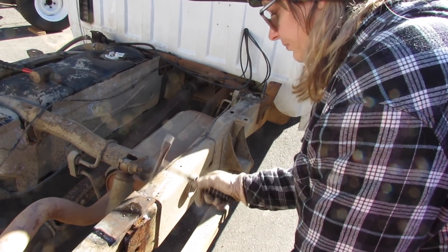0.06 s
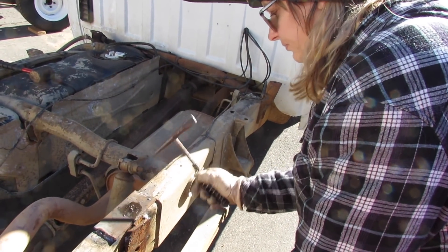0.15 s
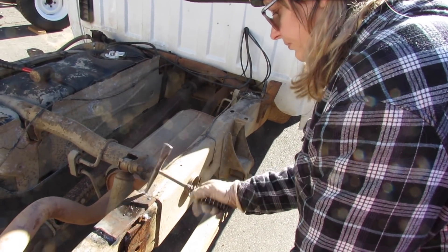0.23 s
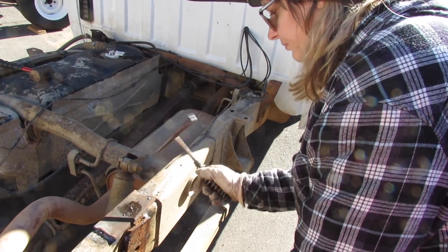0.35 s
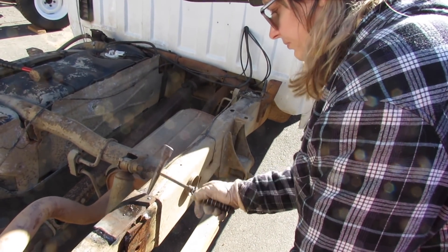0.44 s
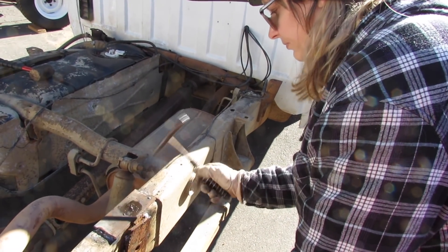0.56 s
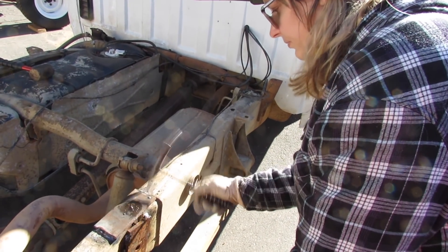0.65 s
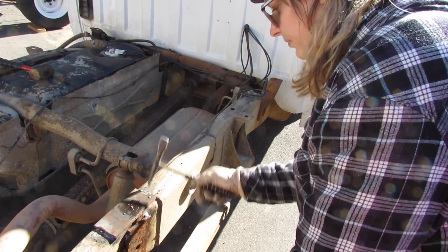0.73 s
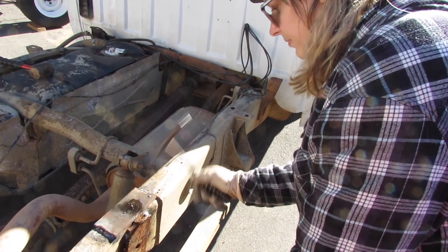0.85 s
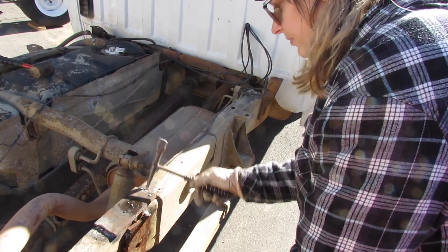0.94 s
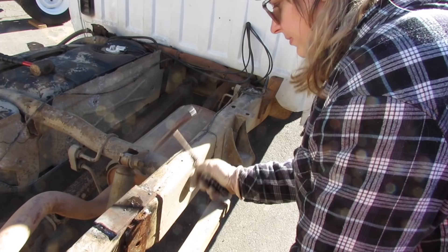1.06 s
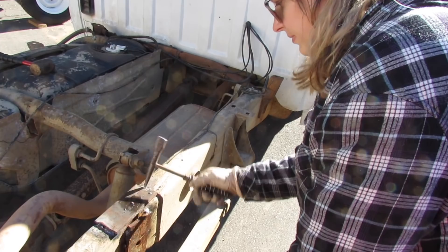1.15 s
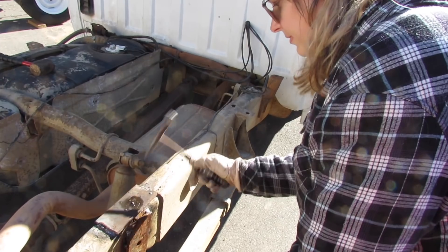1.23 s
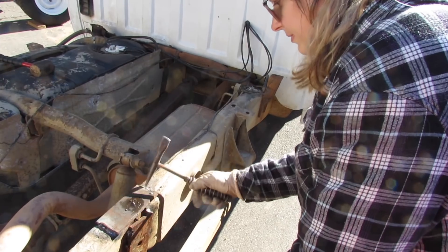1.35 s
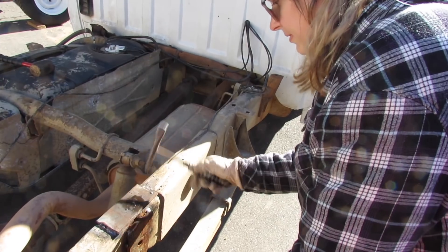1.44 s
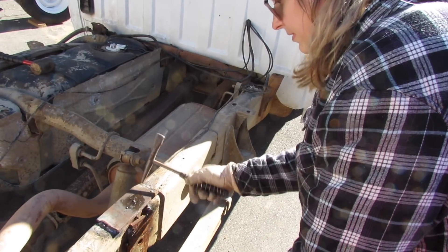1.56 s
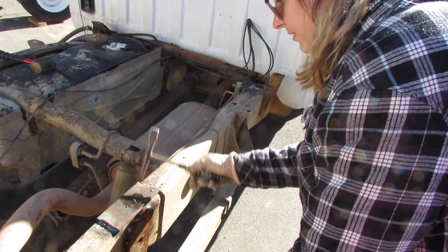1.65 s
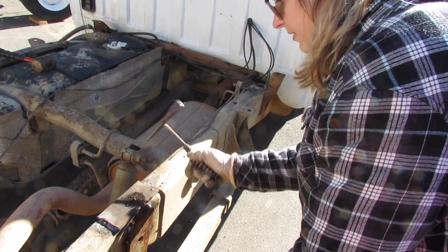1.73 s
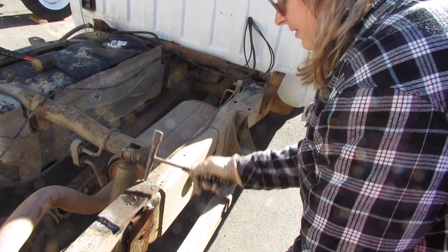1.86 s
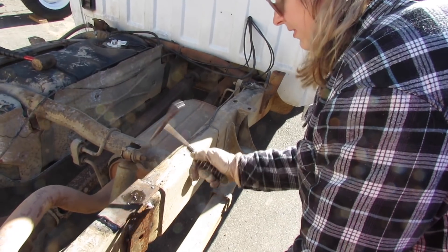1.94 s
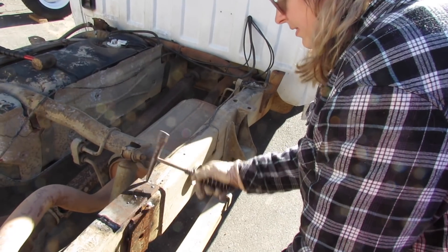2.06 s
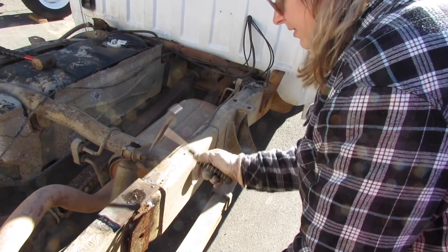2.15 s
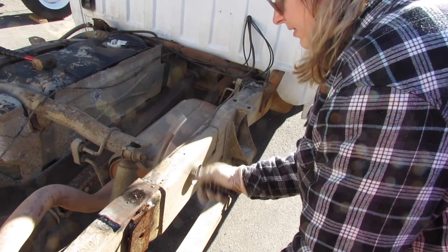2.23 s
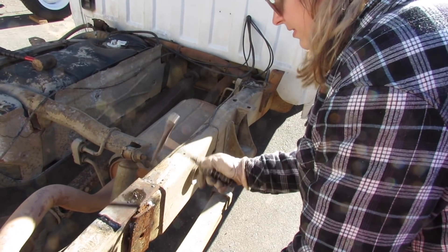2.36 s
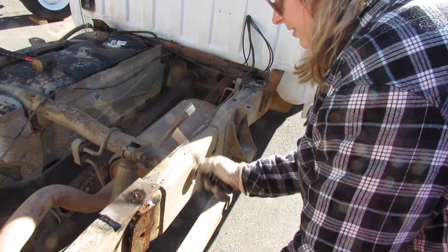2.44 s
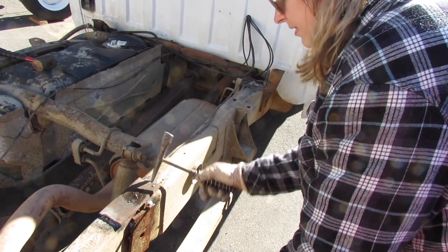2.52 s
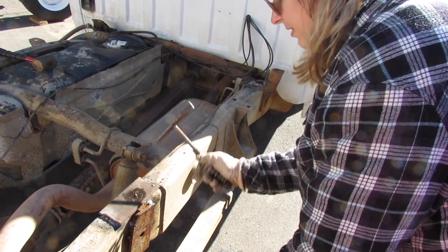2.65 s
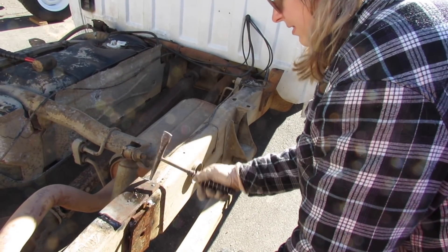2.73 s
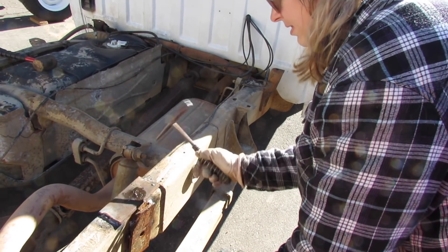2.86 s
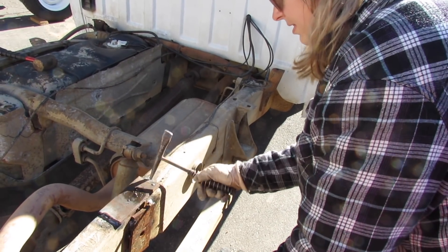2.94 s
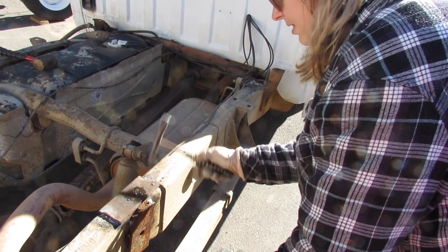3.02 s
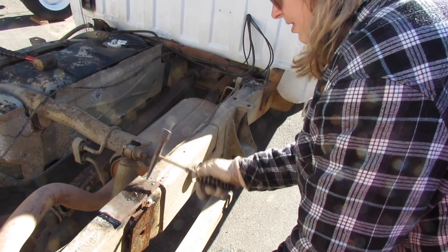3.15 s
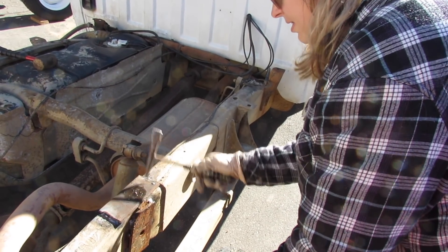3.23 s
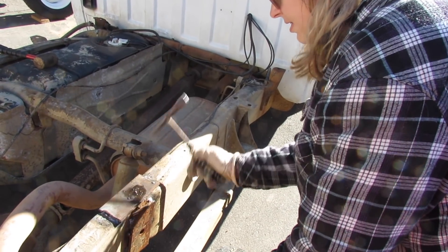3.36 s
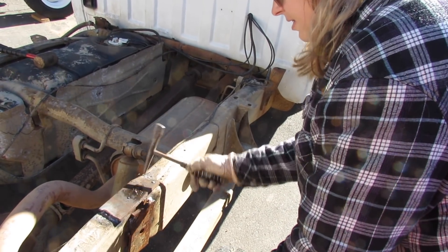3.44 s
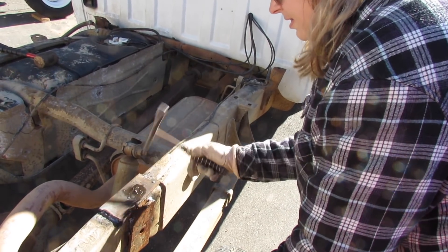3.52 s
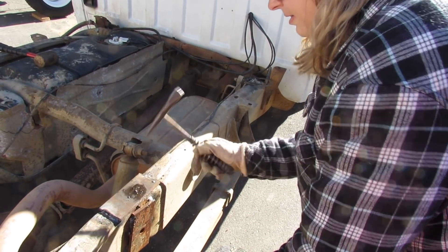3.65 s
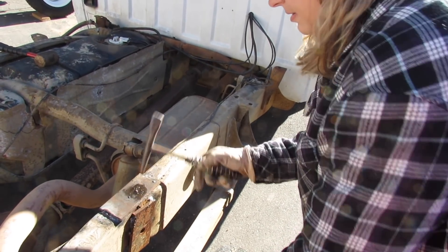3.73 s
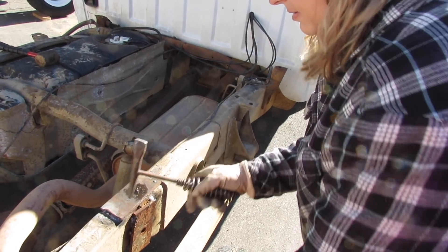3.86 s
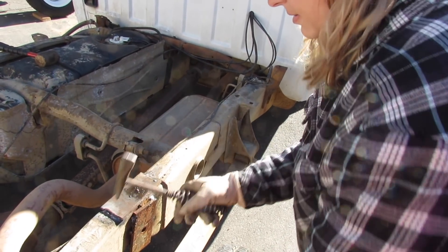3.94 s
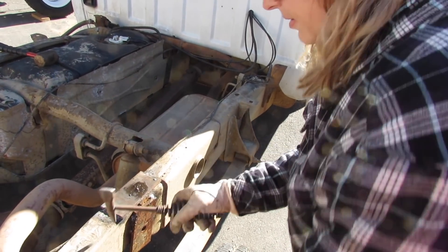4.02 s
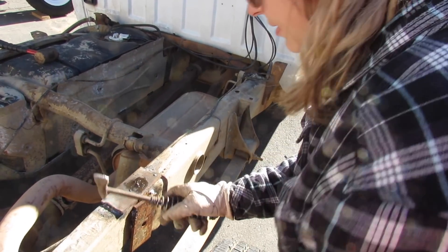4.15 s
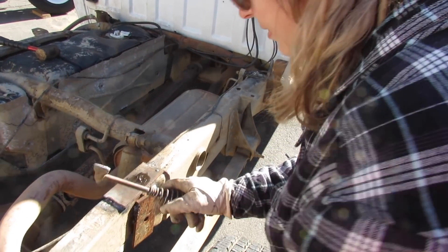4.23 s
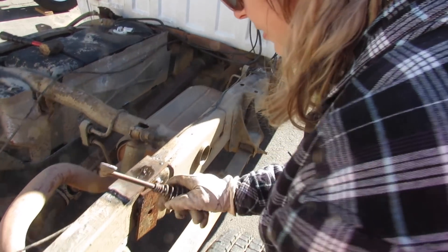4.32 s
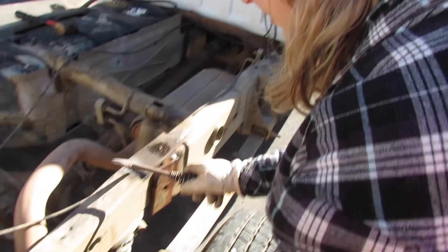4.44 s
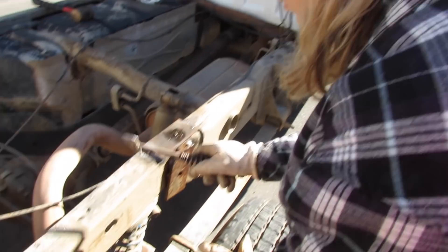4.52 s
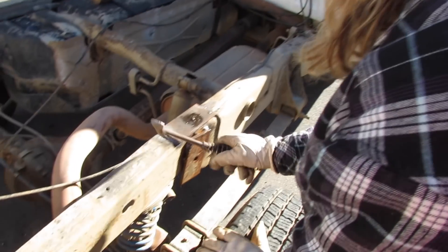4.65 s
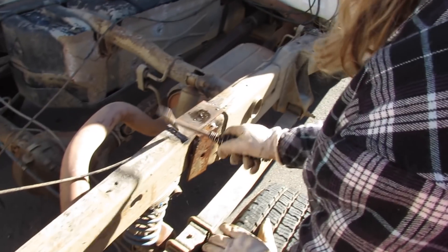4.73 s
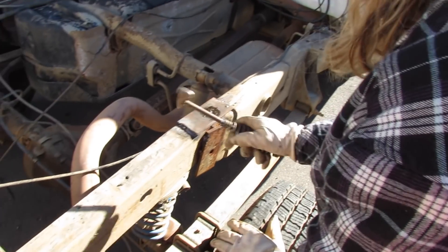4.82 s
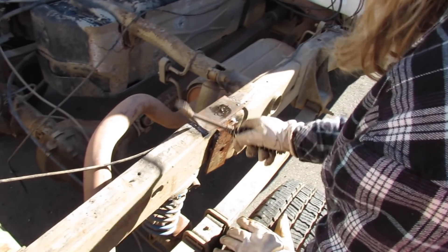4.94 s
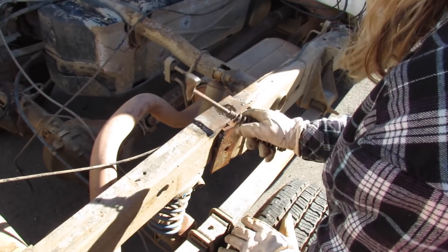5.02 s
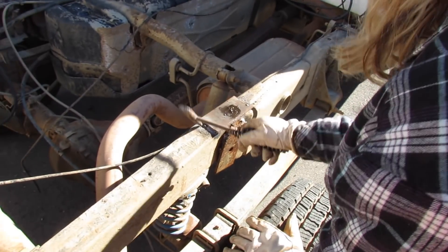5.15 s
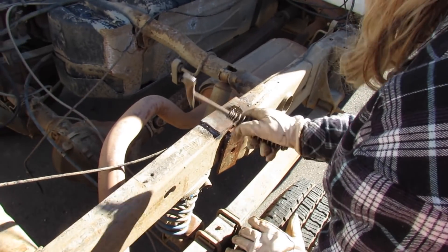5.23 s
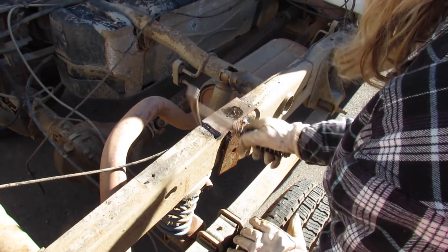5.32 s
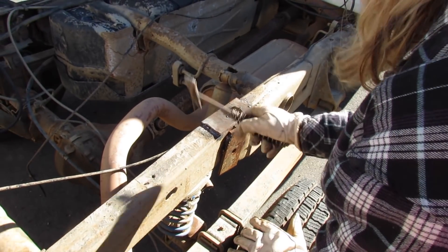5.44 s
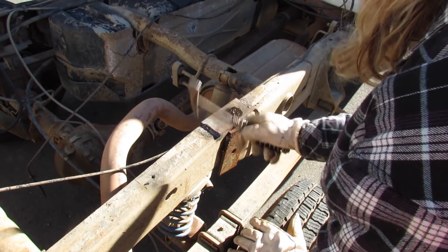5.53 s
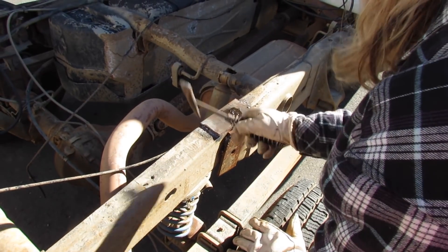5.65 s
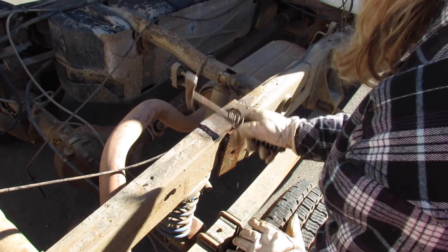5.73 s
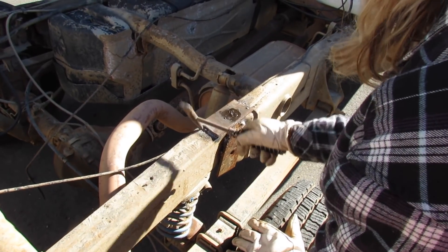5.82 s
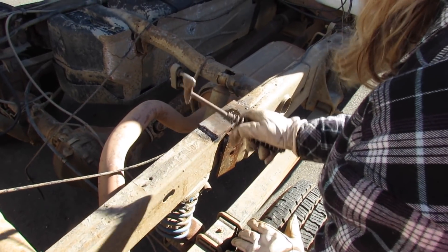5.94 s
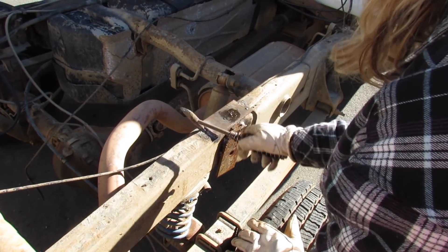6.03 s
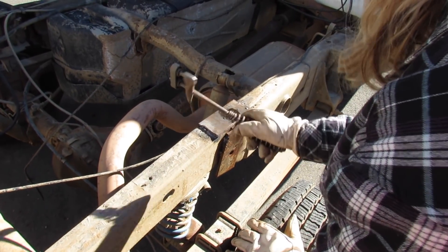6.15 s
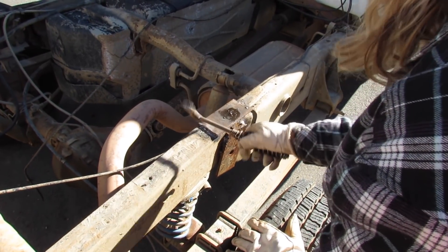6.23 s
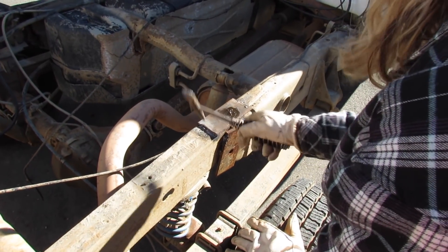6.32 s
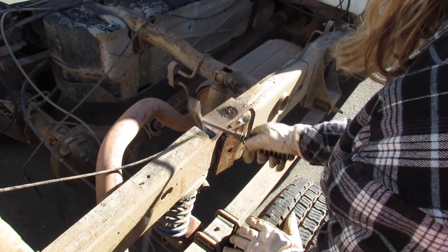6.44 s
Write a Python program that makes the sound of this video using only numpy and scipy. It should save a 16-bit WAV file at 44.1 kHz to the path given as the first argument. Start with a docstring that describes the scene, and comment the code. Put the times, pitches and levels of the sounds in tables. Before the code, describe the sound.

Close, loud taps of a chipping hammer on a heavy steel frame outdoors, quick and even at over four per second. Each is a hard, short clank with a gritty crunch and tiny slag ticks. After a pause of about a second, tapping resumes on another weld with a slightly different ring. A faint steady machine whine and soft yard noise show between blows. Close stereo microphone, blows leaning left, peaks flattened.

```python
"""Taps of a chipping hammer stand over faint yard noise, on one weld of a steel frame, then on another.
Each blow excites decaying modes and a crowd of weak ones heard as noise; slag ticks as it falls.
An engine-driven machine whines faintly outdoors: sines at orders of its shaft speed over filtered noise.
A limiter flattens each blow and a gain control holds the background down."""
import sys
import numpy as np
from scipy import signal
from scipy.fft import rfft, irfft
from scipy.io import wavfile
from scipy.ndimage import uniform_filter1d

SR = 44100
rng = np.random.default_rng(int(sys.argv[2]) if len(sys.argv) > 2 else 0)


def unload_wav(signal):
    """Save mono or channel-first audio to the path in sys.argv[1] as 16-bit WAV at rate SR, clipped to [-1, 1]."""
    wavfile.write(
        sys.argv[1],
        SR,
        np.round(np.clip(np.atleast_2d(signal).T, -1, 1) * 32767).astype(np.int16),
    )


N = 285768

# Levels are those before the limiter and gain control.
# Spectrum of the yard noise: (frequency [Hz], relative density [dB per Hz])
YARD_SPECTRUM = [(25, -41), (100, -15), (245, -16.5), (510, -10), (600, -14), (766, -6), (1280, -6.5),
                 (1640, -11), (4000, -17.5), (9000, -26), (15200, -36.5), (16500, -47)]
# Likeness of the background at the two microphone ports: (frequency [Hz], coherence [-1 to 1])
PORT_LIKENESS = [(60, 0.046), (240, 0.87), (950, -0.087), (3770, -0.033), (15000, -0.64)]
# Left-right balance of the background: (frequency [Hz], left over right [dB])
PORT_BALANCE = [(60, -2.5), (240, 1), (950, 6.0), (3770, 8.5), (15000, 0)]
# Shaft gathering speed, then running nearly steadily: (time [s], speed [turns per s])
SHAFT_SPEED = [(0, 19.81), (1, 19.96), (1.6, 20), (2.3, 20.14), (3.2, 20.17), (3.6, 20.24), (4.3, 20.27),
               (4.9, 20.21), (6.5, 20.24)]
# The machine's two whines: (time [s], rms level of order 68 [dB], rms level of order 76 [dB])
WHINE_LEVELS = [(0, -66, -59), (0.9, -70, -53.5), (1.6, -79, -51.5), (2.06, -61, -52.5), (2.3, -52, -58),
                (3.2, -52.5, -66), (3.6, -48.5, -53), (3.9, -49, -57.5), (4.3, -51.5, -53.5),
                (4.9, -56, -45), (5.6, -61, -47), (6.05, -50.5, -47), (6.48, -53, -48)]
# Other shaft orders: (order [multiple of shaft speed], rms level [dB])
HUM_ORDERS = [(2, -76), (3, -68), (4, -75), (5, -60.5), (6, -73), (8, -67), (9, -69), (10, -71.5),
              (16, -71), (48, -67), (53, -95), (56, -62.5), (59, -74), (60, -73), (67, -70.5)]
# Lag of the machine's tones at the right port: (frequency [Hz], lag [cycles])
PORT_LAG_CYCLES = [(100, 0.15), (300, 0.094), (1500, 0.21)]
# Flakes of slag and the hammer's handle ticking: (time [s], relative level [dB])
TICK_TIMES = [(0.2098, -39), (0.4433, -41), (1.1196, -40), (1.5773, -41), (1.809, -40.5), (1.9435, -39),
              (2.035, -55), (2.2583, -39), (2.7182, -45), (2.942, -40), (3.1618, -37), (3.7667, -43),
              (4.124, -37.5), (5.1113, -49), (6.3734, -40)]
# Crowd of weak modes, one list for each weld: (frequency [Hz], relative density [dB per Hz])
CROWD_SPECTRA = [
    [(71, -76), (120, -18), (540, -7), (735, -7.5), (885, -3), (2280, -1), (2750, -2), (3670, -5.5),
     (9080, -15.5), (14900, -31.5), (16500, -42)],
    [(71, -71), (120, -35), (518, -0.5), (904, -5.5), (1450, -3), (1580, 6.5), (1680, 5), (2580, -3.5),
     (7240, -11), (15200, -26), (16500, -65)],
]
# Decay of that crowd: (frequency [Hz], time to fall 60 dB [s])
CROWD_DECAY = [(200, 0.22), (500, 0.2), (1500, .11), (3000, 0.088), (6000, 0.084), (12000, 0.05)]
# Strong modes of the frame: frequency [Hz]
MODE_HZ = [492, 544, 645, 815, 895, 984, 1057, 1163, 1222, 1275, 1345, 1475, 1562, 1742, 1854, 2014, 2238,
           2399, 2489, 2602, 2686, 2998, 3275, 3375, 3496, 4240, 4322, 5028, 7089, 8990]
# The same modes: (level at first weld [dB], level at second weld [dB], time to fall 60 dB [s])
MODE_LEVELS = [(-22, -9, .2), (-15, -8, .13), (-20, -10, .13), (-16, -8, .1), (-7, -2, .13), (-8, -14, .14),
               (-10, -14, .12), (-8, -6, .12), (-11, -4, .12), (-9, -9, .1), (-8, -9, .12), (-8, -9, .12),
               (0, 0, .11), (-10, -12, .1), (-8, -11, .1), (-7, -13, .1), (-19, -10, .1), (-6, -10, .1),
               (-9, -9, .09), (-14, -4, .09), (-7, -6, .1), (-11, -17, .09), (-12, -13, .09),
               (-12, -16, .09), (-17, -11, .08), (-17, -26, .06), (-20, -19, .06), (-19, -22, .06),
               (-29, -19, .05), (-23, -30, .04)]
# Blows, the last a light touch:
# (time [s], strength [dB], cleanness [dB per octave], extra ring of the main mode [dB])
BLOW_LIST = [(0.067, -8, 0, -5.5), (0.301, -6.5, -1, 1.5), (0.53, -7, 3, -5), (0.754, -9.5, -0.5, 1),
             (0.98, -3.5, 1, 1), (1.206, -7, 2, 10), (1.434, -0.5, 2, 8), (1.663, -9.5, 1.5, 5),
             (1.889, -8.5, 1, 6), (2.117, 0.5, 0.5, 1.5), (2.342, -6.5, 1, 1.5), (2.573, -9.5, 0, 1),
             (2.799, -2.5, 1.5, 2.5), (3.022, -7.5, 0, 1), (3.248, -7.5, -1, 1), (3.5, 0.5, 6, 4.5),
             (4.516, -15, 0, -3), (4.762, -10.5, 2, 4.5), (4.99, -8, 1, 1.5), (5.199, 0.5, 0.5, -1),
             (5.428, -3.5, 1, -9), (5.645, -3, 1, -12), (5.869, -0.5, 3, 1.5), (6.099, -6.5, -1, -1),
             (6.322, -4.5, 0.5, 2.5), (6.463, -39, -3, -30)]

YARD_DB = -47  # rms level of the yard noise
WHINE_ORDERS = (68, 76)
MIDDLE_DB = -10.5  # order 72, relative to the mean of the two whines in dB
PORT_LAG_S = 16e-6  # delay in the part of the crowd noise shared by the right port
SECOND_WELD_S = 4  # blows after this time fall on the second weld
THUD_DB = (-3.33, -4)  # base bass tilt at each weld, dB per octave
THUD_DB_PER_S = 1.33  # growth of the thud along the second weld, dB per octave per s
THUD_PER_CLEAN = 0.49  # a clean steel-on-steel blow widens the bass as well as the treble
BITE_DB, BITE_PER_STRENGTH = 0.5, 0.44  # peak near 4.5 kHz at 0 dB strength; slope in dB per dB
SPOT_DB = 1.5  # spread of the random treble bands that each spot favours
AFTER_DB, AFTER_STRETCH = -25.5, 2.9  # faint after-ring of each mode: level, times longer
BUILD_MS = (0.6, 0.79)  # time scale of crushing the slag at each weld
BLOW_PAN_DB = (4.2, 5.2)  # left over right gain at each weld
KNEE = 1  # amplitude at which peaks flatten
EDGE_HZ = 16700  # upper band limit


def amp(db):
    """Decibel law: the amplitude gain of a level."""
    return 10 ** (np.asarray(db) / 20)


def read(points, hz):
    """Logarithmic pitch scale: interpolates a table on a log-frequency axis."""
    f, value = np.transpose(points)
    return np.interp(np.log(hz + 1), np.log(f + 1), value)


def add(mix, s, sound):
    """Superposition: adds a two-channel sound to the mix at s seconds."""
    part = mix[:, round(s * SR):][:, :sound.shape[1]]
    part += sound[:, :part.shape[1]]


def chance(*size):
    """Gaussian randomness: complex normal numbers of mean power 1."""
    return rng.standard_normal(size + (2,)) @ [1, 1j] / np.sqrt(2)


def late(x):
    """Phase shift theorem: a linear phase delays a sound by the gap between the microphone ports."""
    hz = np.fft.rfftfreq(len(x), 1 / SR)
    return irfft(rfft(x) * np.exp(-2j * np.pi * hz * PORT_LAG_S), len(x))


def yard():
    """Partial coherence: steady filtered noise of yard and fan, in slowly drifting patches."""
    frames, hz = N // 256 + 5, np.fft.rfftfreq(1024, 1 / SR)
    left, other, patches = chance(3, frames, 513).transpose(0, 2, 1)
    patches = uniform_filter1d(patches.real, size=12, axis=0)  # smooth over frequency
    patches = uniform_filter1d(patches, size=14, axis=1)  # smooth over time
    same = np.clip(read(PORT_LIKENESS, hz), -1, 1)[:, None]
    lean = amp(read(PORT_BALANCE, hz) / 2)[:, None]
    right = same * left + np.sqrt(1 - same ** 2) * other
    spectrum = np.array([left * lean, right / lean])
    spectrum *= amp(read(YARD_SPECTRUM, hz)[:, None] + 0.23 * patches / patches.std())
    noise = signal.istft(spectrum, nperseg=1024, noverlap=768)[1][:, :N]
    return amp(YARD_DB) * noise / noise.std()


def machine():
    """Order synthesis: sines locked to multiples of shaft speed, each wavering, with a lag between ports."""
    s, *whine_db = np.transpose(WHINE_LEVELS)
    t = np.arange(N) / SR
    turns = np.cumsum(np.interp(t, *np.transpose(SHAFT_SPEED))) / SR
    first_db, second_db = [np.interp(t, s, db) for db in whine_db]
    lines = list(zip(WHINE_ORDERS, (first_db, second_db))) + HUM_ORDERS
    lines.append((72, (first_db + second_db) / 2 + MIDDLE_DB))
    lines.append((75, first_db - 8.5))  # this order swells with the first whine
    out = np.zeros((2, N))
    for order, db in lines:
        waver_db = np.interp(t, np.arange(60) / 8, 1.2 * rng.standard_normal(60))
        nominal_hz = 20 * order
        start, apart = rng.random(), -read(PORT_LAG_CYCLES, nominal_hz)
        wave = np.sin(2 * np.pi * (order * turns + start + np.array([[0], [apart]])))
        pan = amp(read(PORT_BALANCE, nominal_hz) * np.array([[.5], [-.5]]))
        out += np.sqrt(2) * amp(db + waver_db) * wave * pan  # sqrt(2) turns rms into peak
    return out


def ticks():
    """Impulsive contact: bright noise puffs that decay exponentially within a few milliseconds."""
    out, t = np.zeros((2, N)), np.arange(600) / SR
    band = signal.butter(2, [5500, 16000], "bandpass", fs=SR, output="sos")
    puffs = rng.standard_normal((len(TICK_TIMES), 2, 600))
    for (s, db), puff in zip(TICK_TIMES, puffs):
        partly_shared = puff + 0.28 * puff[0]
        puff = signal.sosfilt(band, partly_shared * np.exp(-t / 0.0017))
        add(out, s, amp(db) * puff * amp([[1.2], [-1.2]]))
    return out


def crowd(noise, colour_db):
    """Modal overlap: modes too close to tell apart act as noise that dies band by band."""
    size = noise.shape[1]
    coloured = irfft(rfft(noise) * amp(colour_db(np.fft.rfftfreq(size, 1 / SR))), size)
    hz, t, spectrum = signal.stft(coloured, SR, nperseg=128)
    fade = amp(-60 * t / read(CROWD_DECAY, hz)[:, None])
    fade = fade + amp(-26 - 60 * t / 0.26)  # faint longer tail from nearby walls
    fade = fade * (1 - np.exp(-np.outer(hz, t + .001) / 3.14))  # the bass takes a few cycles to build up
    crunch = uniform_filter1d(rng.standard_normal(fade.shape), size=12, axis=0)
    crunch = uniform_filter1d(crunch, size=3, axis=1)
    fade = fade * amp(1.84 * crunch / crunch.std())  # crumbling slag makes it come in uneven bursts
    return signal.istft(spectrum * fade, SR, nperseg=128)[1]


def hammer():
    """Modal excitation: each blow starts all modes; the weld sets their shares, the spot scatters them."""
    hz, (*weld_db, t60) = np.array(MODE_HZ), np.transpose(MODE_LEVELS)
    t = np.arange(11008) / SR
    rise = 1 - np.exp(-np.outer(hz, t) / 4.77)  # low modes take longer to build up
    dying = amp(-60 * t / t60[:, None])
    dying = dying + amp(AFTER_DB - 60 * t / (AFTER_STRETCH * t60[:, None]))
    rings = rise * dying * np.exp(2j * np.pi * np.outer(hz, t))
    # close neighbours make each mode beat
    twin_hz = (11.9 + 0.0061 * hz) * rng.uniform(0.75, 1, len(hz)) * rng.choice([-1, 1], len(hz))
    twin = np.exp(2j * np.pi * np.outer(twin_hz, t))
    near_twin, far_twin = rings * twin, rings / twin ** 2
    start = np.exp(2j * np.pi * rng.random((2, len(hz))))
    # each mode reaches the two ports a little differently
    apart = np.exp(1j * rng.normal(0, 1.0, (2, len(hz))) * np.minimum(hz / 2200, 1))
    weld_noise = rng.standard_normal((2, 2, len(t)))
    out = np.zeros((2, N))
    for s, db, bright_db, ring_db in BLOW_LIST:
        k = int(s > SECOND_WELD_S)
        thud_db = THUD_DB[k] + k * THUD_DB_PER_S * (s - SECOND_WELD_S) + THUD_PER_CLEAN * bright_db
        bite_db = BITE_DB + BITE_PER_STRENGTH * db
        spot_db = np.r_[0, SPOT_DB * rng.standard_normal(14)]

        def tilt_db(f):
            """Contact stiffness: a harder or more glancing blow tilts treble and bass."""
            octaves = np.log2((f + 50) / 1500)
            bands_db = np.interp(octaves, np.linspace(.5, 3.5, len(spot_db)), spot_db)
            treble_db = bright_db * np.maximum(octaves, 0)
            bass_db = thud_db * np.maximum(-octaves, 0)
            peak_db = bite_db * np.exp(-((octaves - 1.6) / 0.5) ** 2)
            return bands_db + treble_db + bass_db + peak_db

        weld_share = start[k] * [np.ones(len(hz)), apart[k]]
        share = (weld_share + 0.88 * chance(2, len(hz))) * amp(weld_db[k] + tilt_db(hz))
        share[:, MODE_HZ.index(1562)] *= amp(ring_db)  # the main mode
        left, other = weld_noise[k] + 0.17 * rng.standard_normal((2, len(t)))
        noise = np.array([left, 0.72 * late(left) + 1.08 * other])
        beats = (share * chance(2, len(hz))) @ near_twin + (share * chance(2, len(hz))) @ far_twin
        ring = share @ rings + .55 * beats
        sound = ring.real + amp(14.0) * crowd(noise, lambda f: read(CROWD_SPECTRA[k], f) + tilt_db(f))
        crush = 1 - np.exp(-(t * 1000 / BUILD_MS[k]) ** 2)  # the tip crushes slag before it meets steel
        sound *= crush * amp([[BLOW_PAN_DB[k] / 2], [-BLOW_PAN_DB[k] / 2]])
        onset_rms = np.sqrt(np.mean(sound[:, :400] ** 2))
        add(out, s - .001, amp(db) * sound / onset_rms)
    return signal.sosfilt(signal.butter(2, 180, "highpass", fs=SR, output="sos"), out)


def scene():
    """Superposition: hammer and slag in front of the machine and yard."""
    return hammer() + ticks() + machine() + yard()


def held(db, db_per_s):
    """Peak holding: follows rises at once and lets go at a steady rate."""
    fall = np.arange(N) * db_per_s / SR
    return np.maximum.accumulate(db + fall) - fall


def record(dry):
    """Dynamic compression: quick limiter and slow gain control, then soft clipping and band limits."""
    power = uniform_filter1d((dry ** 2).mean(0), size=160)
    power_db = 10 * np.log10(abs(power) + 1e-12)
    quick_db = 0.48 * np.maximum(held(power_db, 133.0) + 13, 0)  # threshold -13 dB
    slow_db = 0.22 * np.maximum(held(power_db, 20.3) + 25, 0)  # threshold -25 dB
    ducked = dry / amp(uniform_filter1d(quick_db + slow_db, size=60) - 3.5)
    clipped = KNEE * np.tanh(ducked / KNEE)
    rumble_filter = signal.butter(2, 45, "highpass", fs=SR, output="sos")
    clipped = signal.sosfilt(rumble_filter, clipped)
    band_limit = signal.firwin(255, EDGE_HZ, window=("kaiser", 9), fs=SR)
    return signal.oaconvolve(clipped, band_limit[None], "same")


dry = scene()
out = record(dry)
unload_wav(out)
```